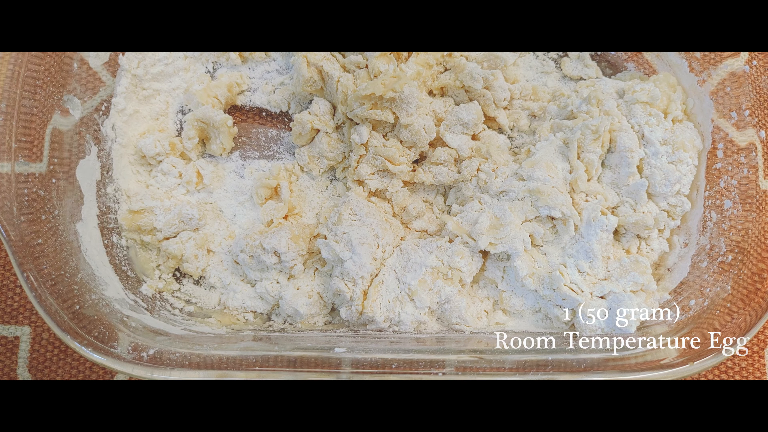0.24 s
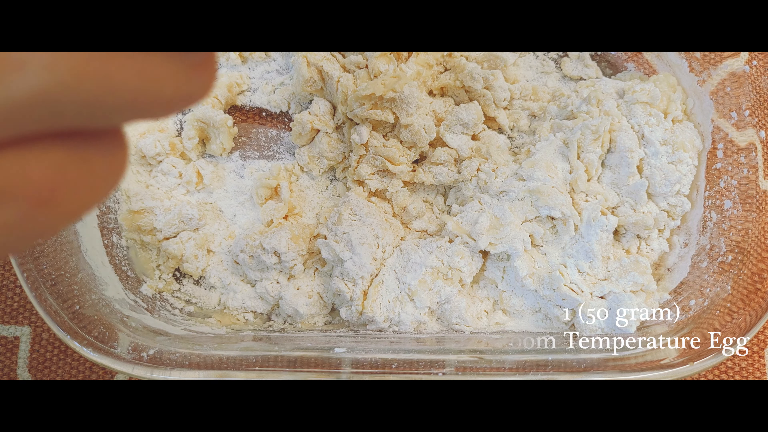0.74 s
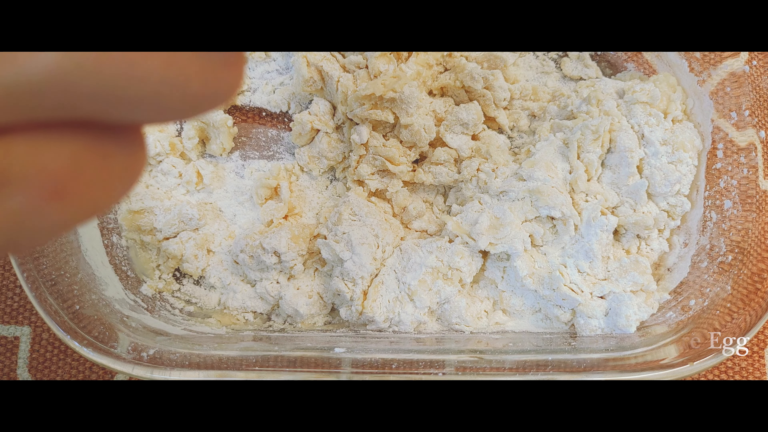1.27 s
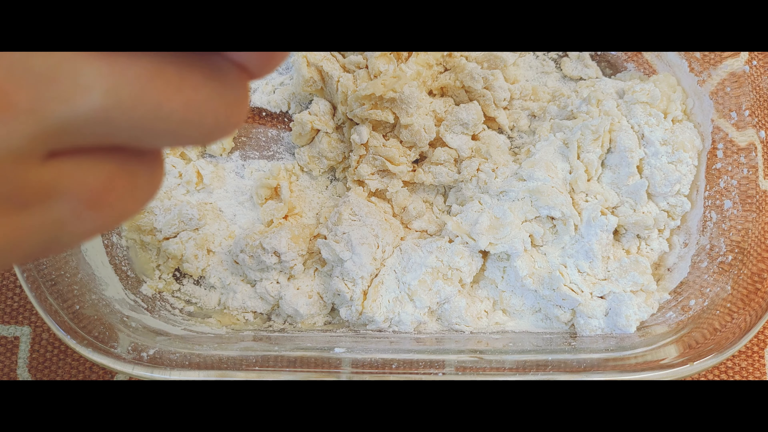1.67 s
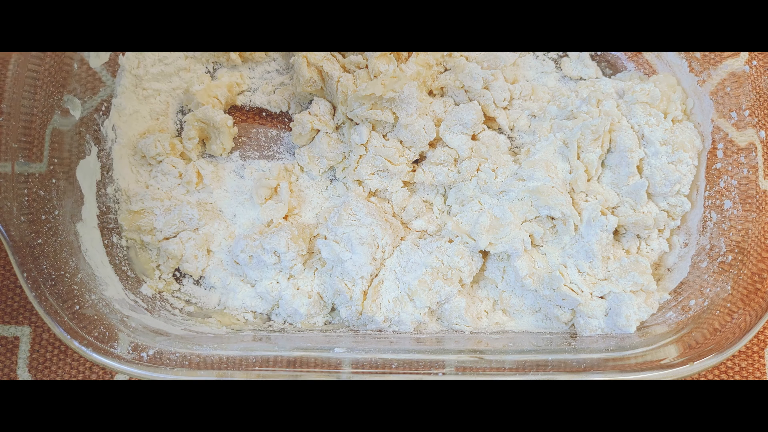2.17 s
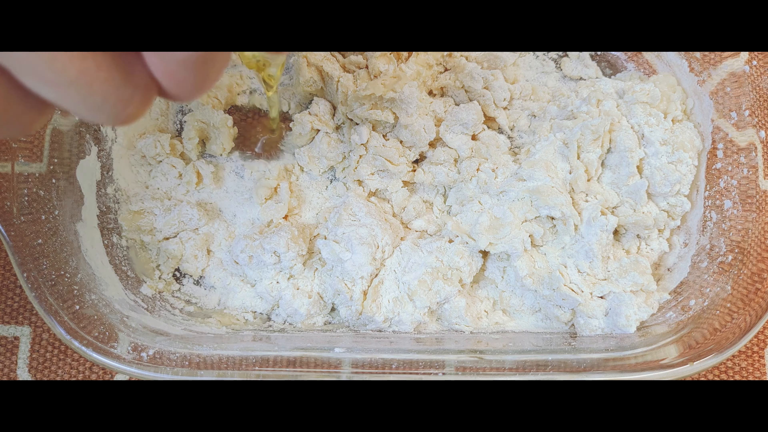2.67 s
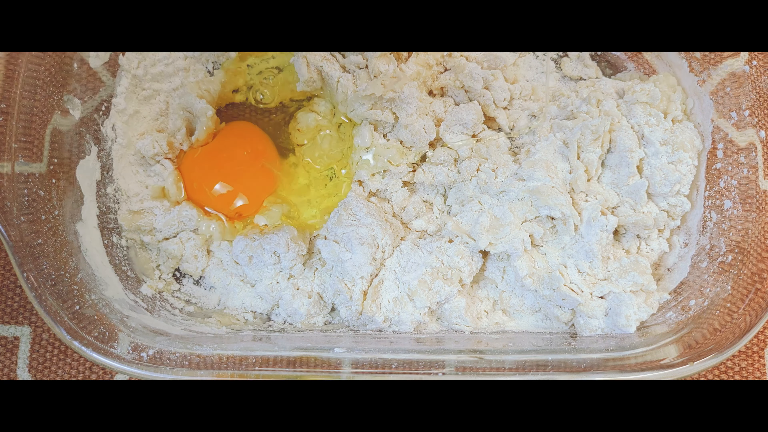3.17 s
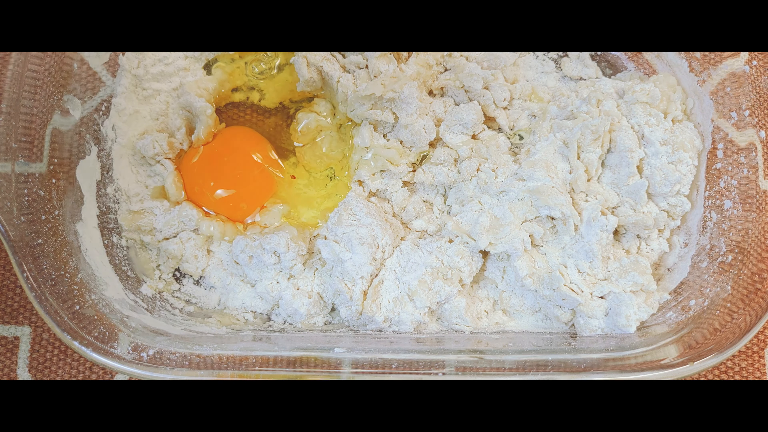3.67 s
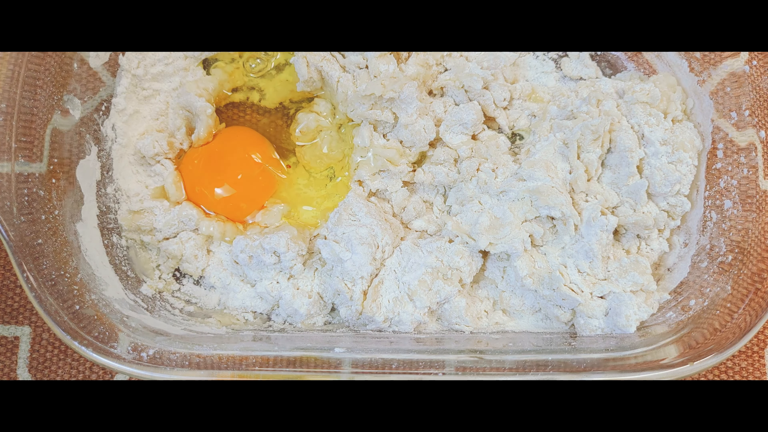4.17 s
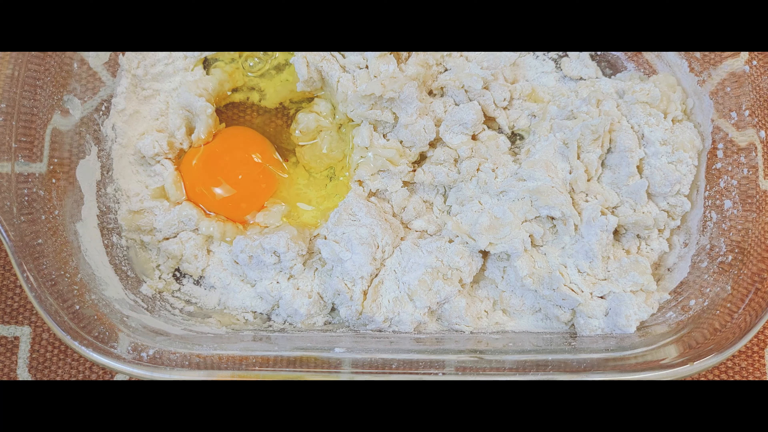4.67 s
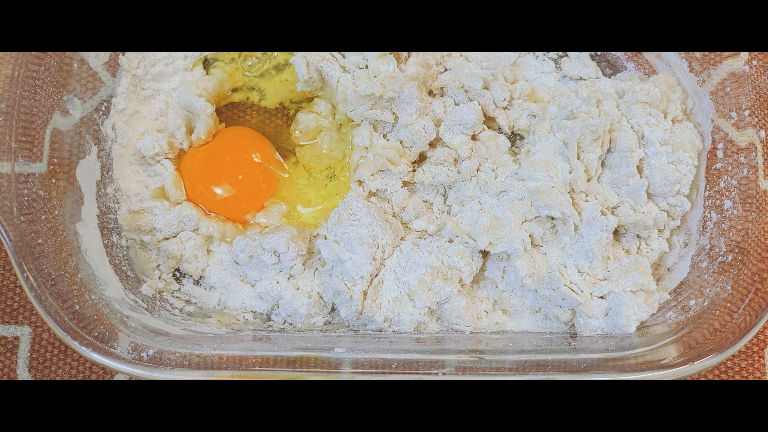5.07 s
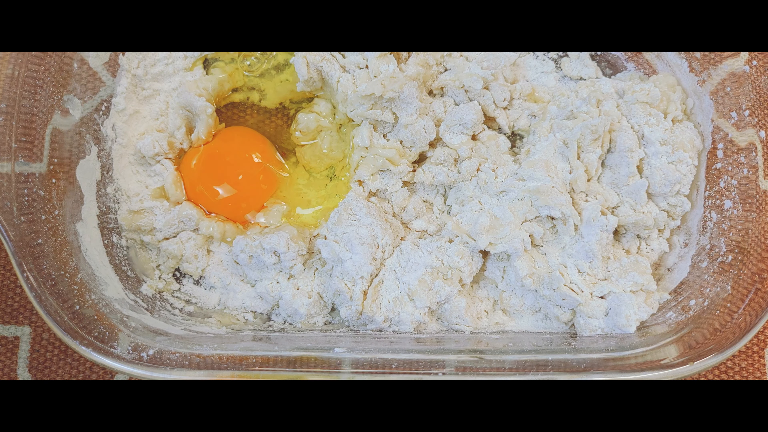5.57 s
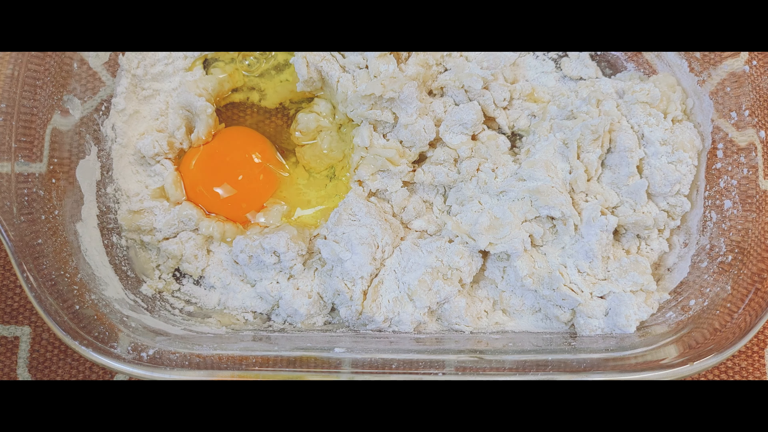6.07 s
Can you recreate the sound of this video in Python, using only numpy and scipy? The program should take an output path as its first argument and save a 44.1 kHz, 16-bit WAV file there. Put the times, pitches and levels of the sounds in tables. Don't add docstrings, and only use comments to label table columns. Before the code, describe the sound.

An egg is rapped once, then its shell cracks sharply and parts with a wet hollow pop, before clunky knocks on a container in a small kitchen.

```python
import sys
import numpy as np
from scipy import signal
from scipy.fft import rfft, irfft
from scipy.io import wavfile

SR = 44100
rng = np.random.default_rng(int(sys.argv[2]) if len(sys.argv) > 2 else 0)


def bounce(signal):
    frames = np.transpose(np.atleast_2d(signal))
    limited = np.clip(frames, -1, 1)
    pcm = np.round(limited * 32767).astype(np.int16)
    wavfile.write(sys.argv[1], SR, pcm)


def volts_from_db(level):
    exponent = np.asarray(level, float) / 20
    return 10 ** exponent


N = 279153

# frequency in Hz, density in dB per Hz.
FLOOR_SPECTRUM = [(13, -47.5), (28, -27), (91, 0.5), (107, 1), (130, -14), (157, -4.5), (218, -20.5),
                  (366, -18), (431, -24.5), (522, -24), (830, -28), (901, -28.5), (1880, -39.5),
                  (8010, -52), (15000, -69)]
HISS_DB = -73
# level in dB of the deepest, deep, low and upper band, then their centres in Hz.
RUMBLE_DB = [-73.5, -67.5, -64.5, -70]
RUMBLE_HZ = np.array([35, 63, 105, 180])
# time in seconds, half length in seconds, pitch in Hz, gain in dB.
TRAFFIC_SWELLS = [(0.1, 0.38, 61, 2), (0.43, 0.069, 103, 7), (0.604, .2, 35, 3.5), (1.802, 0.45, 64.6, 5.5),
                  (2.204, 0.084, 171.2, -10.5), (2.432, 0.13, 110, 13), (2.7, 0.12, 34, 0.5),
                  (3.337, 0.17, 131, 4), (4.606, 0.17, 60.7, -8), (5.103, 0.34, 35, 6),
                  (5.124, 0.3, 179.5, 8), (5.48, 0.067, 105.3, 1), (6.109, 0.46, 82, 11)]
SWELL_OCTAVES = 0.39
# time in seconds, firing rate in Hz, level in dB.
MOTOR_COURSE = [
    (0, 39, -79.5),
    (2.3, 39.41, -79),
    (3.6, 39.74, -74.5),
    (5.0, 39.3, -72.5),
    (6.33, 38.79, -71.5),
]
# multiple of the firing rate, level in dB.
MOTOR_ORDERS = [(1, -2), (3, 6.5), (4, 1.5), (5, -1.5), (6, -2.5), (7, -4), (10, -4.5), (11, -6.5)]

# peak in seconds, rise in seconds, fall in seconds,
# level of the dull part in dB, bright part over the dull one in dB.
RUB_STROKES = [(0.04, 0.18, 0.025, -100, 18), (0.35, 0.043, 0.046, -102, 9),
               (1.57, 0.009, 0.061, -95, 14.5), (2.07, 0.29, 0.15, -83.5, -1.5),
               (2.567, 0.02, 0.011, -56, 7.5), (2.708, 0.073, 0.097, -57.5, -3),
               (2.83, 0.16, 0.02, -65, -22), (2.99, 0.14, 0.026, -49, -5.5),
               (3.029, 0.016, 0.014, -47.5, -11), (3.068, 0.01, 0.013, -52, 9.5),
               (3.55, 0.093, .15, -79, -11.5), (3.69, 0.068, 0.078, -85.5, 10.5),
               (3.66, 0.039, .05, -83, -10), (3.82, 0.079, 0.19, -85, -7.5), (4.1, 0.072, 0.039, -78, -4.5),
               (4.266, 0.051, 0.045, -72.5, -6), (4.371, 0.038, 0.054, -69.5, -13.5),
               (4.399, .003, .008, -58, -13), (4.412, 0.0075, 0.018, -42, -15.5),
               (4.423, 0.012, 0.017, -42, -6), (4.446, 0.0084, 0.026, -46, -8),
               (4.481, 0.018, 0.068, -61, -13), (4.567, 0.031, 0.045, -70.5, -18),
               (4.78, 0.24, .2, -83, -7), (5.114, 0.039, .003, -66.5, -13),
               (5.399, 0.0044, 0.075, -62.5, 4)]
STROKE_EDGE_DB = 15
SLIPS_PER_S = 3500
# frequency in Hz, width in Hz, level in dB.
RUB_DULL = [(1734, 170, 6), (2560, 890, -2.5)]
RUB_BRIGHT = [(5174, 96, 0.5), (8643, 3200, 1.5), (10200, 2400, -10.5), (11900, 1600, -18.5)]

# start in seconds, strength in dB, brightness in dB per register, weight of the thud in dB,
# bite of the crack register in dB (absent for the pops).
FINGER_TICKS = [(0.4685, -79.5, 12, 0.1, 2), (0.783, -84, 7, -7, 0), (0.808, -77, 5, -7, 7),
                (0.8488, -80, 5, 0, -5), (1.083, -82, 12, -9, -6), (1.093, -84, 15, -9, -5),
                (1.1032, -57, 3, -23, 3), (1.123, -36, 4.5, -6, -7), (1.34, -84, 10, -5, 0),
                (1.3555, -79, 8.5, -4.5, 4), (1.3625, -77, 8.5, -5, 4), (1.4705, -76.5, 0, -18, 12.5),
                (1.5197, -79, 4, -2, .1), (1.5598, -74.5, 13, -4, 9.5), (1.5799, -72, 17, -6, 3),
                (1.7205, -75.5, 12.5, -3, 7.5), (3.7312, -76, 6, -10.5, -1), (4.2414, -71, 1, -9.5, -5),
                (4.3674, -74, 6, -23, -4), (4.4207, -48.5, 0.5, -23, -3), (4.4285, -53, 4, -23, -2),
                (4.447, -52, 5, -21, 4), (4.5155, -60, -3, -19, -2.3), (4.5584, -70, -4.5, -25, 5)]
SHELL_SNAPS = [
    (1.1163, -26, 6.9, -6.5, -3),
    (5.3953, -46.5, 7.9, -10, 8.5),
]
SHELL_CRACKS = [(2.3952, -66, 33, -17, -10), (2.5555, -46, 6, -8, 6), (2.5661, -48, 9, -35, 6),
                (2.5772, -12, 4.5, -33.5, 5), (2.581, -29.5, -1, -21, 0), (2.5845, -26, 4, -25, 2),
                (2.5885, -29, -4, -32, -2), (2.605, -40, 9, -16, -5), (2.609, -27, 4, -31, 0.5),
                (2.6268, -42, 12, -20, -1), (2.6292, -16.5, 7, -10, 2), (2.7122, -39, 11, -31, 0),
                (2.7194, -41.5, 6, -26, 9), (2.8683, -43.5, -1.5, -25, 4), (2.9635, -52.5, 6, -21.5, -2),
                (2.9745, -52.5, 8, -31, -8), (2.98, -56, 12, -24, -9.5), (2.9875, -39, 8.5, -20.5, -4.5),
                (2.9975, -57, 10.5, -14, -3), (3.0005, -57, 11, -14, -5), (3.0249, -49.5, 6, -24, 5),
                (3.0275, -47.5, 2.5, -26, 3), (3.0302, -50.5, 3, -23, 7), (3.0525, -42.5, 3, -35, -1),
                (3.0565, -56, 11, -25, -3), (3.06, -45, 10, -25, -6), (3.0713, -48.5, 7.5, -29, 1),
                (3.0765, -51, 7, -29, 1), (3.082, -58, 6, -29, 0), (3.1097, -51, 8, -21.5, -10),
                (3.1125, -54, 9, -21, -10), (3.128, -72, 16, -12, -7), (3.1444, -65.5, 15.5, -12, -7)]
HOLLOW_POPS = [
    (2.9012, -29.5, -2.5, -21.5),
    (2.9025, -25.5, -9, -22.5),
    (2.9077, -36, 1, -18),
    (2.9125, -38, -8.5, -25.5),
    (2.9165, -37.5, -9.5, -31),
    (2.929, -44, -11, -25),
]
CONTAINER_KNOCKS = [(5.1176, -30.5, -7.5, -19, -2), (5.128, -38, 4.5, -13, -4),
                    (5.3883, -62, -15.5, -6, -1.5), (5.3953, -51, -19.5, -11, -11.5),
                    (5.4055, -50, -11, 6.5, 5), (5.4085, -45.5, -10.5, 10, 12),
                    (5.4165, -31, -12, -10, 5.5), (5.4259, -42, -5.5, 3.5, 5),
                    (5.4325, -44.5, -10.5, -1, -6), (5.4786, -47.5, -9, 9, -5),
                    (5.4856, -58.5, -20.5, 8, -6)]
# time in seconds, level in dB.
CONTAINER_THUMPS = [
    (5.6601, -42.5),
    (5.679, -48.5),
    (5.696, -49),
    (5.717, -51.5),
    (5.758, -48),
    (5.785, -55.5),
    (5.82, -57.5),
    (5.85, -57.5),
]

# frequency in Hz, level in dB, 60 dB decay time in seconds.
SHELL_MODES = [(818.4, 0.1, 0.024), (2090, 0.1, .02), (3900, -1.9, 0.0055), (4960, -1, 0.0041),
               (8900, -3, .003), (14200, -8.5, 0.0023)]
WHOLE_EGG_MODES = [(750, 0.1, 0.018), (2180, 0.1, 0.0068), (4000, -3.5, 0.0035), (5800, 0.1, 0.004),
                   (7100, -0.6, .005), (8100, -4.5, 0.0048)]
HOLLOW_MODES = [(851.6, 6.5, 0.012), (1400, 4, 0.0082), (1587, 12.5, 0.023), (1660, 21, 0.025),
                (1820, 18, 0.012), (2490, 7, 0.006), (3860, -5.5, 0.00075), (9156, 0, 0.0017)]
CONTAINER_MODES = [(345, -2.5, 0.023), (593, -13, .03), (797, 4, 0.045), (980, 6.5, 0.036),
                   (1757, 0.1, 0.0238), (3500, 0.1, 0.0099)]
METAL_MODES = [(7000, -10, 0.08), (7060, -7.5, 0.12), (7080, 0.5, 0.16), (7190, -2, 0.16), (7284, 1, 0.17),
               (7397, -1, 0.17), (7870, -13.5, 0.06), (8200, -8, 0.066), (8850, -17, 0.036),
               (9814, -30, 0.0662), (11800, -30, 0.12)]
REGISTER_EDGES_HZ = [1200, 3000, 6500]
# low edge in Hz, high edge in Hz.
TICK_BANDS = [(550, 1200), (1200, 3000), (3000, 6500), (6000, 11000)]
SNAP_BANDS = [(550, 1050), (1550, 3000), (3000, 6500), (6200, 10500)]
SHELL_BANDS = [(620, 1100), (1300, 3000), (3000, 5800), (6000, 15200)]
HOLLOW_BANDS = [(700, 1100), (1350, 2600), (3000, 6500), (6500, 14000)]
CONTAINER_BANDS = [(450, 1050), (1350, 2800), (2800, 5600), (6500, 12500)]
BRITTLE_DB = [3, 4, 8, 8]

# start in seconds, pitch in Hz, level in dB, 60 dB decay time in seconds, flutter in milliseconds.
AIR_POCKETS = [(2.6075, 2140, -30, .015, 2.2), (2.6075, 2410, -30, 0.014, 2.0), (2.632, 2010, -38, .02, 8),
               (2.714, 1285, -52, 0.029, 9), (2.768, 1347, -51, .02, 7), (2.925, 1655, -51, .02, 41),
               (2.925, 1515, -55, .02, 30), (2.925, 1820, -56, .02, 26), (3.07, 1660, -60, .015, 46),
               (2.735, 4550, -63, .002, 46), (2.396, 6300, -63, .003, 19), (2.395, 8600, -55, 0.00059, 13),
               (2.5775, 2350, -26, 0.009, 1.5), (5.397, 9500, -55.5, .0006, 16),
               (5.12, 5600, -58, .002, 14), (1.1225, 7600, -34.5, .003, 1.5),
               (3.056, 3100, -44, 0.0038, 9.3), (3.053, 4400, -48.5, 0.0047, 6),
               (3.7305, 9000, -48, 0.001, 0.6), (3.735, 8800, -61.5, 0.00061, 15),
               (5.471, 331, -48.5, 0.037, 11.3), (5.702, 460, -75, .06, 50),
               (4.075, 2710, -70.5, 0.0082, 14), (4.241, 2140, -68.5, .008, 19.3),
               (4.366, 1730, -59.5, 0.017, 3.5), (4.43, 5420, -51.5, 0.0045, 16.3),
               (4.553, 1620, -62, .03, 9), (5.122, 780, -42.5, 0.02, 7), (1.1158, 2300, -37.5, 0.0025, 1.2),
               (1.121, 1750, -54, 0.0055, 5), (5.3945, 1560, -38, .006, 1.5), (5.4315, 1650, -33, .01, 3),
               (5.43, 780, -39.5, .02, 8), (5.396, 4400, -48, 0.0033, 20), (5.119, 6500, -60, 0.0017, 9),
               (5.118, 14500, -69, .002, 8.2)]
MORE_POCKETS = [(1.1161, 12500, -31, 0.00027, .2), (1.117, 13500, -59, .0004, 12),
                (5.396, 14000, -64, .0004, 14), (2.5772, 3700, -20, .003, 0.66),
                (2.582, 4900, -30, .002, 3.49), (2.629, 13800, -24, .002, .5), (3.7308, 11200, -52, .001, .6),
                (3.7168, 8800, -62, 0.00074, .6), (5.419, 1540, -30, .02, 4), (5.412, 770, -32.5, .03, 5),
                (5.5, 1040, -53, .015, 20), (5.14, 7260, -60, .04, 60), (4.418, 7400, -49, .004, 11),
                (4.418, 2960, -48, .008, 3), (4.408, 2070, -50, .015, 6.6), (4.408, 1770, -47, .015, 7.6),
                (5.118, 1750, -18, .0025, .7), (5.1175, 3800, -32, .002, .8), (5.125, 880, -44.5, .02, 9.8),
                (5.126, 4100, -45.5, 0.0026, 6), (5.4172, 1650, -16, .0028, 0.82),
                (5.4165, 4040, -30.5, .003, 1), (5.407, 3000, -37.5, .005, 1.5), (5.396, 4000, -43, .005, 2),
                (5.86, 500, -69, .15, 180)]

# frequency in Hz, 60 dB decay time in seconds.
DISH_T60 = [(400, .4), (1000, 0.5), (2000, 0.25), (4000, 0.27), (6500, 0.25), (9500, 0.18), (14000, 0.11)]
ROOM_T60 = [(400, 0.65), (1000, 0.53), (2000, 0.54), (3400, 0.61), (4800, 0.4), (7300, 0.45), (9500, 0.15),
            (14000, 0.12)]
# frequency in Hz, level in dB.
DISH_COLOUR = [(400, -17), (1000, -6), (2300, 1), (4500, 1.5), (6000, -2), (9000, 0.5), (14000, -5)]
ROOM_COLOUR = [(400, -8), (1150, -8), (1600, 1.5), (3600, 3), (4400, -3.5), (6800, -6), (9500, -18.5),
               (14000, -23)]


def rms_one(x):
    return x / np.sqrt(np.mean(x ** 2) + 1e-20)


def peak_one(x):
    return x / np.abs(x).max(axis=-1, keepdims=True)


def in_time(rows):
    s, *columns = np.transpose(rows)
    return [np.interp(np.arange(N) / SR, s, column) for column in columns]


def at_hz(points, hz):
    point_hz, values = np.transpose(points)
    return np.interp(np.log(hz + 1), np.log(point_hz), values)


def bandpass(x, low_hz, high_hz, order):
    return signal.sosfilt(signal.butter(order, [low_hz, high_hz], "band", fs=SR, output="sos"), x)


def ring(force, hz, t60):
    r, w = volts_from_db(-60 / (t60 * SR)), 2 * np.pi * hz / SR
    return signal.lfilter([0, np.sin(w)], [1, -2 * r * np.cos(w), r * r], force)


def resonate(x, peaks):
    out = 0
    for k, (hz, width, level_db) in enumerate(peaks):
        r = np.exp(-np.pi * width / SR)
        poles = [1, -2 * r * np.cos(2 * np.pi * hz / SR), r * r]
        gain = (-1) ** k * volts_from_db(level_db) * (1 - r * r)
        out = out + gain * signal.lfilter([1, 0, -1], poles, x)
    return rms_one(out)


def registers(events, contact_ms, bite_db=0.0):
    rows = []
    for s, db, slope, weight, *bite in events:
        body_db = db - slope
        levels_db = [body_db + weight, body_db, db + bite_db + sum(bite), db + slope]
        rows.append((s, levels_db, contact_ms))
    return rows


def struck(events, modes, bands_hz, crack_db, crumble_db, spread_db, size):
    out, t = np.zeros((2, N + size)), np.arange(size) / SR
    modes = np.array(modes)
    register = np.searchsorted(REGISTER_EDGES_HZ, modes[:, 0])
    for s, levels_db, contact_ms in events:
        age = t / (max(contact_ms, .05) * 1e-3 / 2)
        click = (t == 0) + 1e-18
        crumble = rng.standard_normal(size) * age * np.exp(1 - age)
        force = np.array([click + volts_from_db(crumble_db) * crumble, click])
        chance_db = 3 * rng.standard_normal(len(modes))
        at = round(s * SR)
        for k, level_db in enumerate(levels_db):
            rings = sum(volts_from_db(db + chance) * ring(force, hz, t60)
                        for (hz, db, t60), chance in zip(modes[register == k], chance_db[register == k]))
            crack = peak_one(bandpass(force, *bands_hz[k], 4))
            rings = peak_one(bandpass(rings, *bands_hz[k], 4)) * volts_from_db([[0], [spread_db[k]]])
            direct, even = peak_one(rings + volts_from_db(crack_db[k]) * crack)
            even = even * np.linalg.norm(direct) / np.linalg.norm(even)
            out[:, at:at + size] += volts_from_db(level_db) * np.array([direct, even])
    return out[:, :N]


def traffic_db():
    t = np.arange(0, N, 64) / SR
    out = np.array(RUMBLE_DB, float)[:, None]
    for s, half, hz, db in TRAFFIC_SWELLS:
        octaves = np.log2(np.array(RUMBLE_HZ) / hz)[:, None]
        out = out + db * np.exp(-((t - s) / half) ** 2 - (octaves / SWELL_OCTAVES) ** 2)
    return [np.interp(np.arange(N) / SR, t, row) for row in out]


def motor():
    firing_hz, level_db = in_time(MOTOR_COURSE)
    phase, out = 2 * np.pi * np.cumsum(firing_hz) / SR, 0
    for order, db in MOTOR_ORDERS:
        fading_db = 1.2 * np.interp(np.arange(N) / SR * 2.7, np.arange(60), rng.standard_normal(60))
        out = out + volts_from_db(db + fading_db) * np.sin(order * phase + 2 * np.pi * rng.random())
    return volts_from_db(level_db) * out


def background():
    hz = np.fft.rfftfreq(N, 1 / SR)
    noise = rfft(rng.standard_normal(N)) * volts_from_db(at_hz(FLOOR_SPECTRUM, hz))
    edges = [0, 50, 80, 140, 230, SR]
    *lows, hiss = [rms_one(irfft(noise * (hz >= a) * (hz < b), N)) for a, b in zip(edges, edges[1:])]
    rumble = sum(volts_from_db(level_db) * low for level_db, low in zip(traffic_db(), lows))
    return volts_from_db(HISS_DB) * hiss + rumble + motor()


def strokes():
    out, t = np.zeros((2, N)), np.arange(N) / SR
    for s, rise, fall, db, bright_db in RUB_STROKES:
        span = slice(max(int((s - 4 * rise) * SR), 0), int((s + 4 * fall) * SR))
        away = np.maximum((s - t[span]) / max(rise, .001), (t[span] - s) / max(fall, .001))
        out[:, span] += volts_from_db(db - STROKE_EDGE_DB * away ** 1.6) * np.array([[1], [volts_from_db(bright_db)]])
    return out


def rubbing():
    dull, bright = strokes()
    sizes = volts_from_db(3.3 * np.minimum(rng.exponential(1, (2, N)), 5)) * rng.choice([-1, 1], (2, N))
    slips = sizes * (rng.random((2, N)) < SLIPS_PER_S / SR) + 1e-18
    highpass = signal.butter(3, 1250, "high", fs=SR, output="sos")
    dull_sound = signal.sosfilt(highpass, resonate(slips[0], RUB_DULL))
    bright_sound = bandpass(resonate(slips[1], RUB_BRIGHT), 4200, 12500, 3)
    return dull * dull_sound + bright * bright_sound


def finger_ticks():
    return struck(registers(FINGER_TICKS, contact_ms=0.88), SHELL_MODES[:-1], TICK_BANDS, BRITTLE_DB,
                  crumble_db=-17.5, spread_db=[-18.5, -13.5, -19.5, -19.5], size=3000)


def air_pockets():
    out, t = np.zeros(N), np.arange(16000) / SR
    for s, hz, db, t60, flutter_ms in AIR_POCKETS + MORE_POCKETS:
        age = t / (flutter_ms / 1000)
        force = age * np.exp(-age) * rng.standard_normal(len(t)) + 1e-18
        rung = ring(ring(force, hz, t60), hz, t60)
        at = round(s * SR)
        out[at:at + len(t)] += volts_from_db(db) * peak_one(bandpass(rung, hz / 1.6, min(hz * 1.6, 17000), 2))
    return out


def shell_snaps():
    return struck(registers(SHELL_SNAPS, contact_ms=0.66), WHOLE_EGG_MODES, SNAP_BANDS, BRITTLE_DB,
                  crumble_db=-16.5, spread_db=[-17, -14, -20, -19], size=3000)


def shell_cracks():
    return struck(registers(SHELL_CRACKS, contact_ms=0.48), SHELL_MODES, SHELL_BANDS, BRITTLE_DB,
                  crumble_db=-11, spread_db=[-18.5, -22, -19.5, -20], size=3000)


def hollow_pops():
    return struck(registers(HOLLOW_POPS, contact_ms=1.4, bite_db=-7), HOLLOW_MODES, HOLLOW_BANDS,
                  [0.5, -1.0, 7, 21.5], crumble_db=-13.0, spread_db=[0.7, 1.2, -22, -19], size=14000)


def container_knocks():
    return struck(registers(CONTAINER_KNOCKS, contact_ms=2.01), CONTAINER_MODES + METAL_MODES, CONTAINER_BANDS,
                  [3, 6, 10, -18], crumble_db=-11.5, spread_db=[-15.0, -24.0, -29.5, 5.0], size=16000)


def container_thumps():
    clicks = np.zeros(N) + 1e-18
    for s, db in CONTAINER_THUMPS:
        clicks[round(s * SR)] = volts_from_db(db + 30.5)
    return bandpass(clicks, 540, 950, 3)


def kitchen(x, t60s, colour, onset_ms, near_db, near_t60):
    t, echo = np.arange(SR) / SR, 0
    edges = 250 * 2 ** np.arange(0, 6.2, 1 / 3)
    near = volts_from_db(near_db - 60 * t / near_t60) * np.clip(t / 0.00084, 0, 1)
    for low, high in zip(edges, edges[1:]):
        band = bandpass(rng.standard_normal(SR), low, high, 3)
        hz = np.sqrt(low * high)
        walls = volts_from_db(-60 * t / at_hz(t60s, hz)) * np.clip(t / (onset_ms * 0.00044), 0, 1) ** 2
        echo = echo + band * volts_from_db(at_hz(colour, hz)) * (walls + near)
    return signal.fftconvolve(x, echo / np.sqrt(np.sum(echo ** 2)))[:N]


def scene():
    air = background()
    rub = volts_from_db(-3.0) * rubbing() + air_pockets()
    ticks, ticks_room = finger_ticks()
    snaps, snaps_room = shell_snaps()
    cracks, cracks_room = shell_cracks()
    pops, pops_room = hollow_pops()
    knocks, knocks_room = container_knocks()
    thumps = container_thumps()
    near = volts_from_db(-11.5) * rub + volts_from_db(-11.0) * ticks_room + volts_from_db(-10.0) * snaps_room
    near += volts_from_db(-8.0) * cracks_room + volts_from_db(-14) * pops_room
    far = volts_from_db(-7.0) * knocks_room + volts_from_db(6.5) * thumps
    room = kitchen(near, DISH_T60, DISH_COLOUR, onset_ms=3.8, near_db=5.0, near_t60=0.064)
    room += kitchen(far, ROOM_T60, ROOM_COLOUR, onset_ms=12.0, near_db=13.0, near_t60=0.11)
    return (air + rub + ticks + snaps + cracks + pops + knocks + thumps + room)[None]


def low_pass(x):
    return signal.sosfilt(signal.butter(12, 16810, fs=SR, output="sos"), x)


def record(dry):
    mix = signal.sosfilt(signal.butter(8, 15500, fs=SR, output="sos"), dry)
    return low_pass(mix)


dry = scene()
out = record(dry)
bounce(out)
```